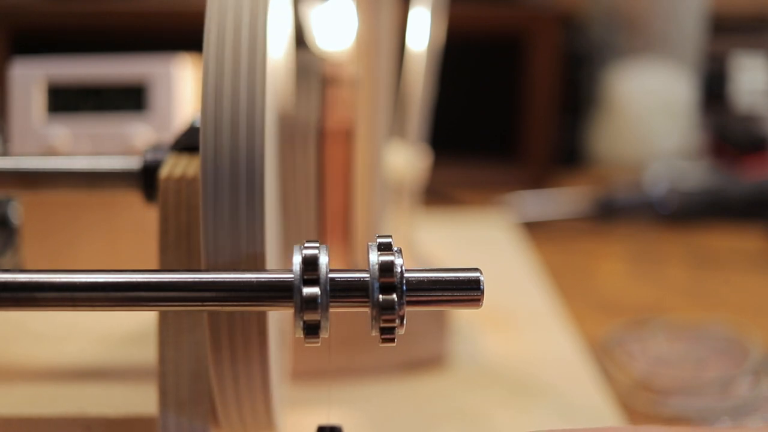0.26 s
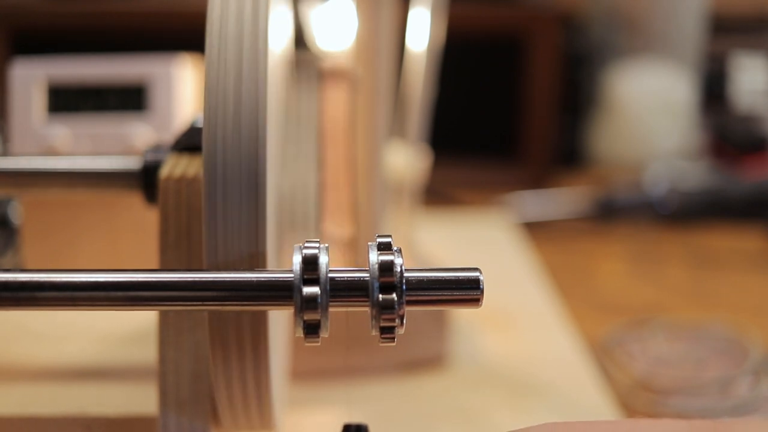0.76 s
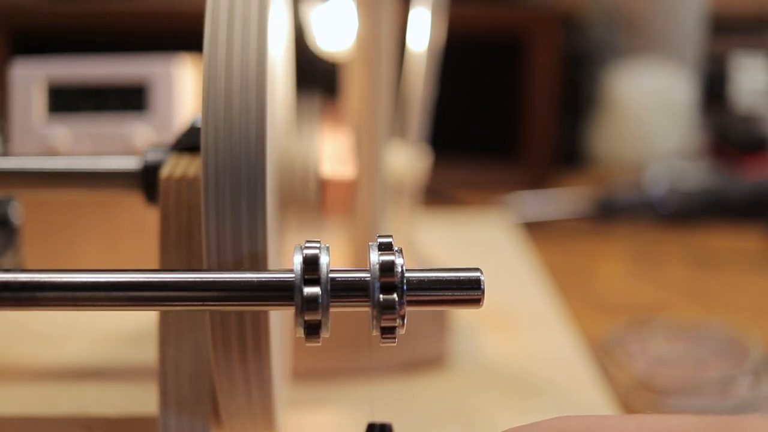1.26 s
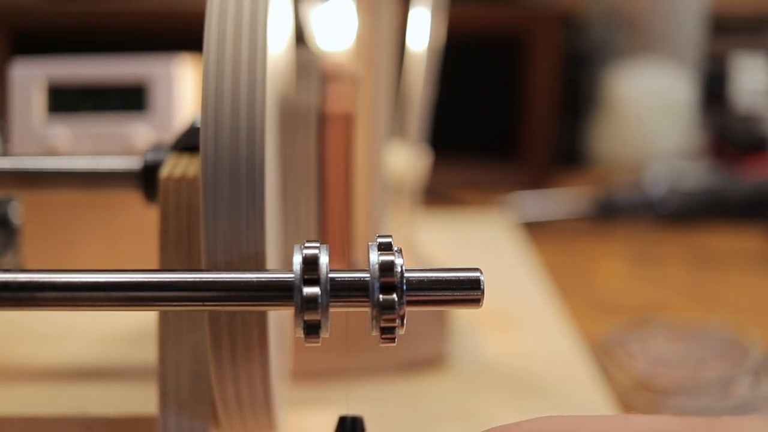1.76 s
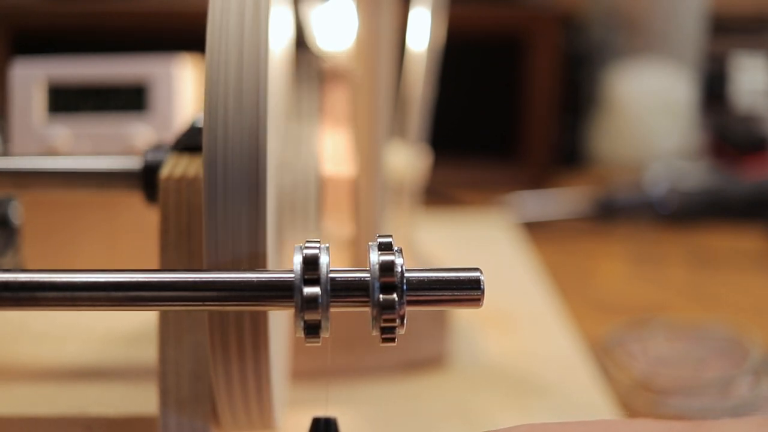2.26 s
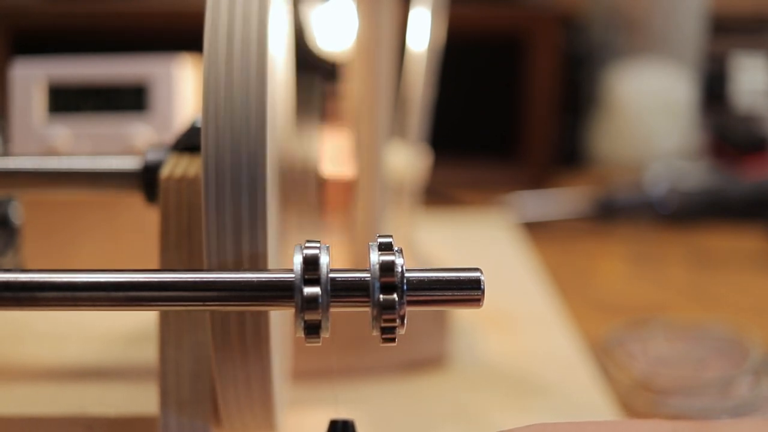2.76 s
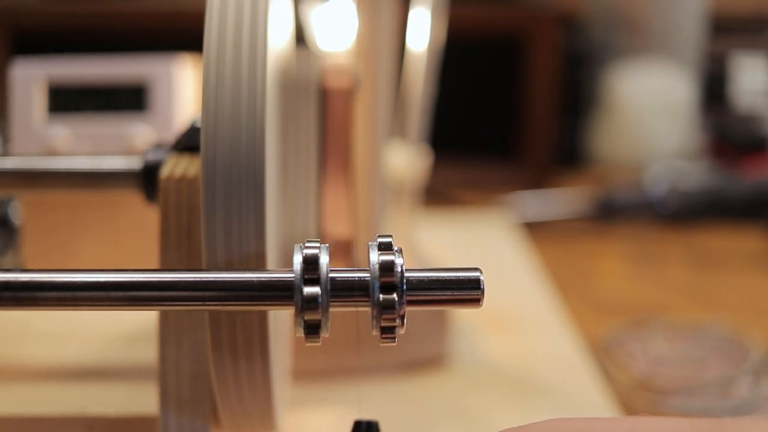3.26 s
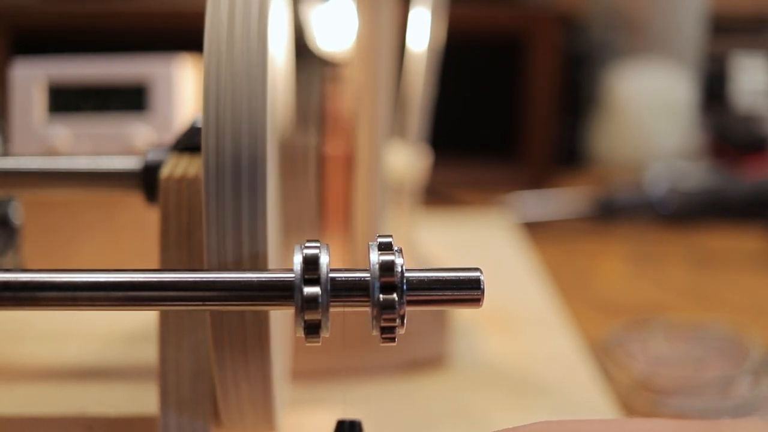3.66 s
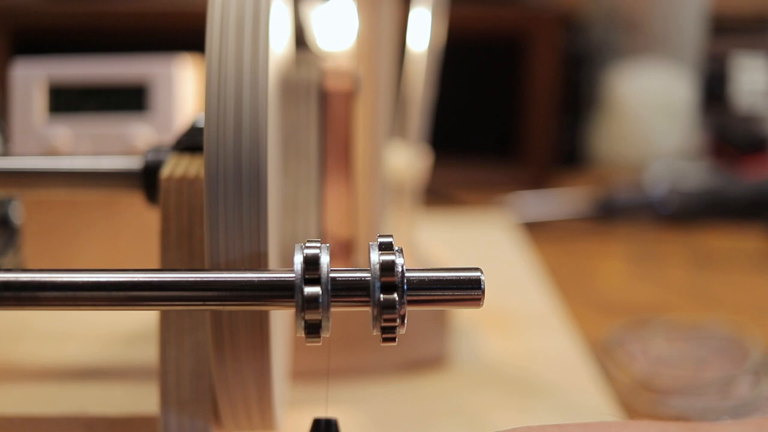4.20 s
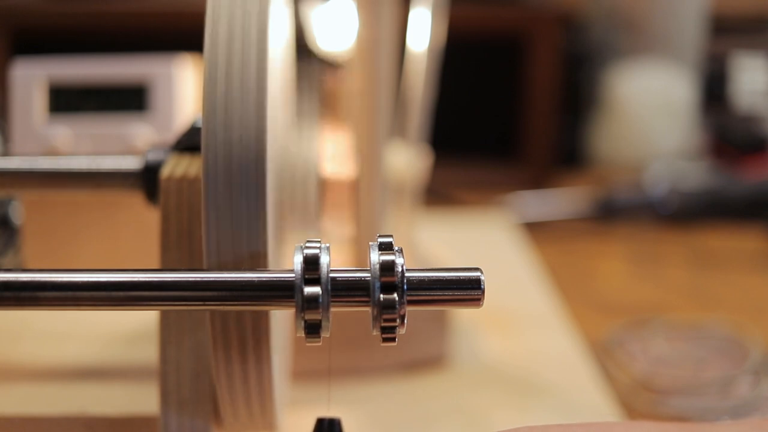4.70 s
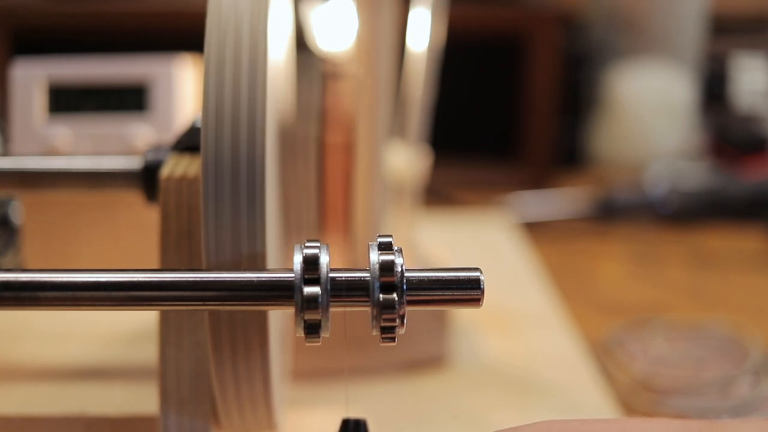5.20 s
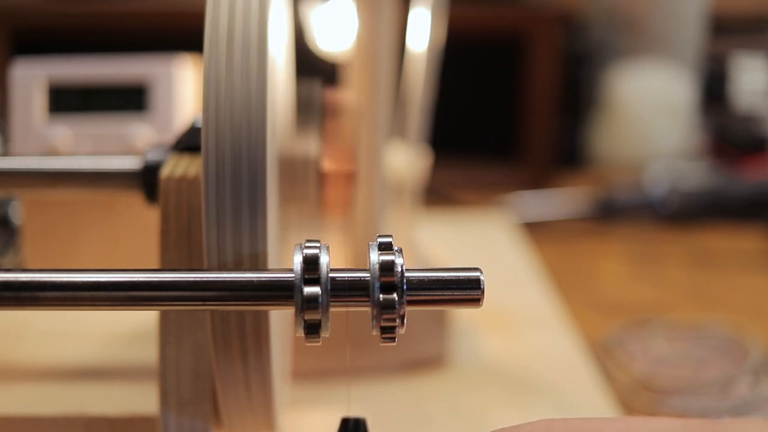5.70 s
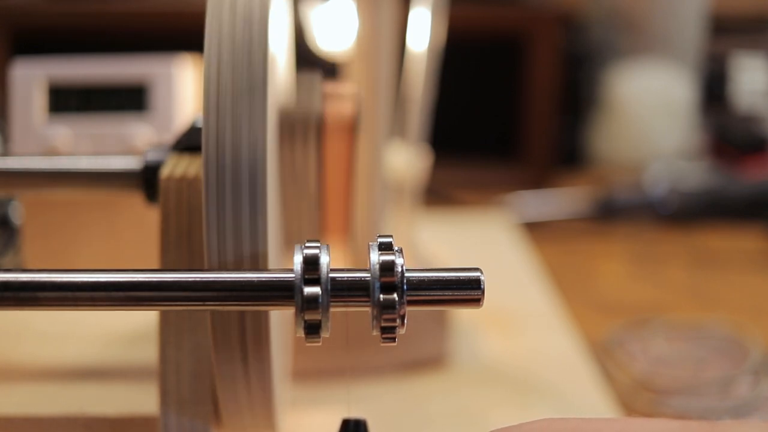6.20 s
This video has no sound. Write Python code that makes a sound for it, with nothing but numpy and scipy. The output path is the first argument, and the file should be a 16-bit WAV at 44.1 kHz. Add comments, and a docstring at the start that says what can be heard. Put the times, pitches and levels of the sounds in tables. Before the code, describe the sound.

A small geared motor runs with a steady, fluttering high whine, rattle and rapid chirps, then starts falling in pitch near the end.

```python
"""A steady, fluttering whine: a small geared motor spins a homemade coil winder on a wooden bench.
The whine comes from the teeth of its small gear. Around it the rotor (the motor's spinning part) hums,
the brushes buzz, the gears rattle and a dry shaft chirps once a turn, over faint room noise.
Near the end the power is cut: hum and buzz die, the whine falls and the chirps stand out as it coasts."""
import sys
import numpy as np
from scipy import signal
from scipy.fft import rfft, irfft
from scipy.io import wavfile
from scipy.ndimage import uniform_filter1d

SR = 44100
rng = np.random.default_rng(int(sys.argv[2]) if len(sys.argv) > 2 else 0)


def log_audio(samples):
    """Write samples as a 16-bit WAV file to the path given in sys.argv[1]."""
    # one column per channel
    frames = np.atleast_2d(samples).T
    # limit to full scale, then quantise
    limited = np.clip(frames, -1, 1)
    pcm = np.round(limited * 32767).astype(np.int16)
    wavfile.write(sys.argv[1], SR, pcm)


N = 284443
T = np.arange(N) / SR

# Levels in the tables are relative. A "multiple" is a pitch divided by the rotor's speed.
# tone of the room's air (frequency [Hz], level [dB])
ROOM_TONE = [(20, -33), (45, -16), (65, -27), (100, 9.5), (160, -3), (230, -2.5), (400, -9), (1500, -3),
             (4000, 2), (8000, -4.5), (15000, -23)]
# rotor speed under power (time [s], speed [turns/s])
POWERED_SPEED = [(0.1, 98.3), (0.93, 98.4), (1.42, 98.2), (3.6, 98.6), (5.36, 98.3), (5.5, 98.2)]
# hum of the rotor's imbalance and magnetic pull (multiple [x], level [dB])
HUM_TONES = [(0.5, -62), (1, -45.5), (2, -48.5), (3, -49), (4, -57.5), (5, -65), (6, -50.5)]
# slow swell of the hum as the wire pulls (time [s], level [dB])
WIRE_PULL = [(0, 1), (.7, 2), (1.3, 2.5), (2.3, -0.5), (3.4, 2), (4.1, 1.5), (4.8, -1.5), (5.6, 2)]
# buzz of the brushes on the motor's turning contacts (multiple [x], level [dB])
BRUSH_TONES = [(23, -53), (24, -48), (25, -51), (26, -43), (29, -49), (32, -50), (34, -52), (36, -48),
               (38, -48), (39, -47), (40, -44), (41, -49), (43, -52), (44, -47), (45, -51), (46, -51),
               (47, -48), (48, -46), (50, -54), (53, -54), (54, -57), (55, -54), (56, -58), (57, -58),
               (59, -58), (60, -59), (67, -58), (79, -62), (95, -60), (96, -60)]
# tone of the brushes' fizz (frequency [Hz], level [dB])
FIZZ_TONE = [(4500, -16), (5500, 5), (7000, -2), (8300, -8), (9500, -3), (11000, -14), (15000, -8)]
# tones of those contacts that go on without current (multiple [x], level [dB])
CONTACT_TONES = [(32, -5), (36, -7), (48, 0), (54, -10), (60, -10), (72, -5), (96, -9)]
# where the motor's case rings (frequency [Hz], width [Hz], level [dB])
CASE_RINGS = [(2740, 470, -3), (3920, 270, 1), (4400, 450, -2)]
# broad response of the frame (frequency [Hz], level [dB])
FRAME_TONE = [(25, -38), (65, -12), (115, -9.5), (155, -10), (215, -6), (500, -5), (900, -2.5), (2100, -1),
              (3600, -7.5), (4650, -3.5), (5200, -11), (8000, -18.5), (9300, -17.5), (10500, -23.5),
              (13500, -32.5)]
# where the gearbox rings (frequency [Hz], width [Hz], level [dB])
GEARBOX_RINGS = [(1151, 72, -34.5), (1190, 47, -56), (965, 300, -41.5)]
# sharper ticks of the gears (time [s], level [dB])
HARD_TICKS = [(0.8607, -13), (2.0614, -14), (3.039, -15), (3.3144, -17), (3.4832, -15.5), (3.693, -14.5),
              (4.4598, -12), (4.6684, -15)]
# tone of a tick (frequency [Hz], level [dB])
TICK_TONE = [(400, -6), (1500, 1.5), (2600, 8.5), (5000, -5), (8000, -12.5), (15000, -41)]
# dry rubbing in the bearing (frequency [Hz], width [Hz], level [dB])
RUB_BANDS = [(2570, 204, -38.5), (2860, 500, -39.5), (4060, 250, -55), (9060, 1400, -58)]
# how hard the dry bearing grips (time [s], level [dB])
BEARING_GRIP = [(0, -2), (1.8, 3.5), (2.2, -3.5), (3.5, 1), (4.3, -2.5), (5.6, -1.5)]
# notes the slack shaft draws from the case and the bearing (pitch [Hz], level [dB])
SLACK_NOTES = [(3950, -38), (6000, -45.5), (11500, -57.5)]
# the shaft's hardest squeaks (time [s], level [dB], pitch [Hz])
HARD_SQUEAKS = [(0.1296, -31, 8900), (1.0645, -33, 8900), (1.5589, -30.5, 9100), (2.83, -32, 8840),
                (4.7706, -28.5, 8740), (5.798, -30, 9010)]
# the coasting shaft's hardest chirps (time [s], level [dB], pitch [Hz])
HARD_CHIRPS = [(5.941, -22.5, 2620), (6.1496, -18.5, 2600), (6.177, -24.5, 2540), (6.2245, -23, 2590)]
# overtones of the last squeal (pitch [x SQUEAL_HZ], level [dB])
SQUEAL_TONES = [(2, -34.5), (3, -36), (4, -50), (5, -54)]
# tone of the scratch in a squeak (frequency [Hz], level [dB])
SCRATCH_TONE = [(2000, -18), (4000, 3), (6000, 2), (9000, -20), (14000, -16)]
# the tone of meeting teeth and the side tones of uneven gears (multiple [x], level [dB])
WHINE_TONES = [(8.5, -53), (9, -53), (9.5, -54), (10.5, -56), (11, -32), (11.5, -42), (12, -45), (14, -51),
               (16, -54)]
# bench resonances that the falling whine passes through (frequency [Hz], width [Hz], boost [dB])
BENCH_RINGS = [(850, 50, 3), (630, 60, 8), (420, 50, 3)]

TEETH, WHEEL_RATIO, SHAFT_RATIO = 11, 11 / 81, 22 / 81  # small gear's teeth; turns per rotor turn
RIPPLE_HZ = 120  # pulsing of the power supply
CUT_S, FRICTION_HZ_PER_S, DRAG_PER_S = 5.61, 52, .41  # the power cut and the braking after it
CURRENT_HOLD_S, CURRENT_FADE_S, IMBALANCE_DB = .07, .057, -16
SLACK_HZ = 9.9  # the gears go slack over this drop in speed
POWERED_CONTACTS_DB, FREE_CONTACTS_DB = -57, -31.5
TOUCH_S, APART_DIP_DB, CROSSING_DIP_DB = 5.752, 9.5, 6  # a moment of firm tooth contact; whine dips
SLIP_S, SLIP_STRETCH = 5.796, .58  # the moment of one slip; how strongly slowing lengthens slips
CHIRP_HZ, CHIRP_DB, SQUEAK_HZ, SQUEAK_DB = 2710, -27.5, 8850, -41.5  # base values; each slip varies
FREE_SQUEAK_DB, REBOUND_DB = 2, -28.5
SQUEAL_S, SQUEAL_HZ = 6.428, 2890


def undb(db):
    """Turn decibels into a gain."""
    return 10 ** (np.asarray(db) / 20)


def level(x, db):
    """Scale a sound to an average (rms) level."""
    return x * undb(db) / np.sqrt(np.mean(x ** 2))


def curve(rows):
    """Join (time [s], value) rows with straight lines."""
    return np.interp(T, *np.transpose(rows))


def wander(rate):
    """A smooth random wobble of size about 1, with rate new values a second."""
    hold = max(int(SR / rate), 1)
    steps = np.repeat(rng.standard_normal(N)[:N // hold + 1], hold)
    return level(uniform_filter1d(uniform_filter1d(steps, hold), hold)[:N], 0)


def wave(turns):
    """A sine wave with one cycle per turn and a random start."""
    return np.sin(2 * np.pi * (turns + rng.random()))


def ring(x, hz, width):
    """Let a sound ring at one frequency."""
    return signal.lfilter(*signal.iirpeak(hz, hz / width, fs=SR), x)


def colour(x, points, size=2048):
    """Shape a sound's tone with (frequency [Hz], level [dB]) points."""
    hz, db = np.transpose(points)
    grid = np.maximum(np.arange(size + 1) * SR / (2 * size), 1)
    cepstrum = irfft(np.log(undb(np.interp(np.log(grid), np.log(hz), db))))
    # make the filter ring only after a sound, never before it
    cepstrum[1:size] *= 2
    cepstrum[size + 1:] = 0
    return signal.fftconvolve(x, irfft(np.exp(rfft(cepstrum))))[:N]


def clicks(rate, spread_db):
    """Tiny random hits of uneven size, about rate a second."""
    hits = (rng.random(N) < rate / SR) * rng.choice([-1, 1], N)
    return level(hits * undb(spread_db * np.minimum(rng.exponential(size=N), 5)), 0)


def slackness(speed):
    """0 while the motor pulls the gears tight, 1 once they run free."""
    return np.clip((np.interp(CUT_S, T, speed) - speed) / SLACK_HZ, 0, 1) * (T > CUT_S)


def slowing(speed, fall_db):
    """A gain that drops by fall_db each time the speed halves."""
    return undb(fall_db * np.log2(speed / speed.max()))


def since(turns, start):
    """Turns counted from a start time."""
    return turns - np.interp(start, T, turns)


def each_turn(turns):
    """The times at which a turn is completed."""
    return T[1:][np.diff(np.floor(turns)) > 0]


def rotor_speed():
    """Turns a second: nearly steady under power, then braked by friction and drag."""
    offset = FRICTION_HZ_PER_S / DRAG_PER_S
    speed = (curve(POWERED_SPEED) + offset) * np.exp(-DRAG_PER_S * np.maximum(T - CUT_S, 0)) - offset
    return speed * (1 + .0004 * wander(9))


def room_air():
    """The faint, steady noise of the room."""
    return level(colour(rng.standard_normal(N), ROOM_TONE, size=4096), -43)


def rotor_hum(turn):
    """A low hum that throbs with the load of the big wheel, plus the power supply's ripple."""
    load = 1 + .55 * wave(WHEEL_RATIO * turn) + .25 * wave(SHAFT_RATIO * turn) + .08 * wander(25)
    hum = sum(undb(db + 2) * wave(k * turn) for k, db in HUM_TONES)
    ripple = wave(RIPPLE_HZ * T) * (1 + .7 * wave(turn))
    return hum * load + level(ripple, -50.5)


def brush_buzz(turn):
    """The brushes scrape the same track on every turn: a buzz with a faint fizz above it."""
    buzz = sum(undb(db) * wave(k * turn) * (1 + .12 * wander(12)) for k, db in BRUSH_TONES)
    track = irfft(np.exp(2j * np.pi * rng.random(160)), 1024)
    scrape = np.interp(turn + .001 * wander(60), np.arange(len(track)) / len(track), track, period=1)
    fizz = level(colour(scrape, FIZZ_TONE), -50.5)
    side_tone = level(wave(36 * turn - RIPPLE_HZ * T), -47)  # the ripple splits it off overtone 36
    return undb(3) * buzz + fizz + side_tone


def motor_contacts(turn, speed):
    """The turning contacts make rough tones that ring the motor's case, louder once it runs free."""
    tones = sum(undb(db) * wave(k * turn + .18 * wander(300)) for k, db in CONTACT_TONES)
    strength = undb(POWERED_CONTACTS_DB + slackness(speed) * (FREE_CONTACTS_DB - POWERED_CONTACTS_DB))
    case = sum(undb(db) * ring(ring(tones, hz, width), hz, width) for hz, width, db in CASE_RINGS)
    return strength * slowing(speed, fall_db=1) * case


def gear_rattle(turn, speed):
    """Loose teeth hit in bunches and ring the frame and gearbox, softer and duller when slow."""
    pace = speed / speed.max()
    bunches = undb(1.7 * wave(turn) + 1.5 * wave(2 * turn)
                   + 1.4 * wave(RIPPLE_HZ * T) + 1.3 * wave(WHEEL_RATIO * turn))
    frame = level(colour(bunches * clicks(rate=7000, spread_db=2.5), FRAME_TONE), -32)
    dull = signal.sosfilt(signal.butter(1, 4500, fs=SR, output="sos"), frame)
    knocks = clicks(rate=260, spread_db=.9) * undb(.87 * wave(WHEEL_RATIO * turn))
    knocks = signal.sosfilt(signal.butter(2, [700, 1700], "band", fs=SR, output="sos"), knocks)
    box = sum(level(ring(knocks, hz, width), db) for hz, width, db in GEARBOX_RINGS)
    return slowing(speed, fall_db=6.2) * (pace * frame + (1 - pace) * dull + pace ** 1.7 * box)


def tooth_ticks():
    """Now and then a tooth lands hard and knocks the frame."""
    bursts = sum(undb(db) * np.exp(-np.abs(T - at) / .004) * (T >= at) for at, db in HARD_TICKS)
    return bursts * level(colour(rng.standard_normal(N), TICK_TONE), -7)


def chirps(rows, speed, length, glide, rough):
    """Sticking and slipping makes a short, sagging tone per (time [s], level [dB], pitch [Hz]) row."""
    out = np.zeros(N + SR)
    uneven_grip = np.resize(rough * wander(900), N + SR)
    stretch = (speed.max() / speed) ** SLIP_STRETCH
    for at, db, hz in rows:
        start = max(int((at - length / 5) * SR), 0)
        longer = stretch[min(start, N - 1)]
        progress = np.linspace(0, 1, int(length * longer * SR))
        span = slice(start, start + len(progress))
        cycles = np.cumsum(hz * (1 + glide * (.5 - progress))) / SR + uneven_grip[span] / longer
        out[span] += undb(db) * np.sin(np.pi * progress ** .89) ** 2 * wave(cycles)
    return out[:N]


def shaft_slips(turn, speed):
    """Each turn the shaft slips with a chirp and a thin squeak; when slack it also rebounds and sings."""
    angle, slack = since(SHAFT_RATIO * turn, SLIP_S), slackness(speed)
    times = each_turn(angle)
    late, size, pitch, squeak_size = rng.uniform(-1, 1, (len(times), 4)).T
    grip, free, drift = (np.interp(times, T, v) for v in (curve(BEARING_GRIP), slack, wander(4)))
    chirp_rows = np.transpose([times + .004 * late, CHIRP_DB + 2 * size + grip, CHIRP_HZ + 110 * pitch])
    squeak_db = SQUEAK_DB + 3.2 * squeak_size + grip / 2 + FREE_SQUEAK_DB * free + 1.5 * drift * (1 - free)
    squeak_rows = np.transpose([times + .0025 * late, squeak_db, SQUEAK_HZ + 250 * pitch])
    rebounds = [(at, REBOUND_DB, CHIRP_HZ + 110 * rng.uniform(-1, 1))
                for at in each_turn(angle + .5) if at > CUT_S]
    notes = [(at, db + 2 * rng.normal(), hz * (1 + .02 * rng.normal()))
             for at in each_turn(2 * angle) if at > CUT_S for hz, db in SLACK_NOTES]
    chirp = chirps(chirp_rows, speed, length=.016, glide=.08, rough=.07)
    chirp += slack * chirps(rebounds + notes, speed, length=.016, glide=.08, rough=.09)
    squeak = chirps(squeak_rows, speed, length=.017, glide=.048, rough=.27)
    return slowing(speed, fall_db=.3) * chirp, squeak


def dry_shaft(turn, speed):
    """The shaft rubs and slips in its dry bearing; a few slips bite harder and the slowest squeals."""
    chirp, squeak = shaft_slips(turn, speed)
    chirp += chirps(HARD_CHIRPS, speed, length=.012, glide=.067, rough=.07)
    squeak += undb(-5.5) * chirps(HARD_SQUEAKS, speed, length=.018, glide=.033, rough=.22)
    squeal_rows = [(SQUEAL_S, db, k * SQUEAL_HZ) for k, db in SQUEAL_TONES]
    squeal = chirps(squeal_rows, speed, length=.021, glide=.11, rough=.25)
    # on the slack shaft every squeak drags a short scratch with it
    scuff = level(colour(clicks(rate=3000, spread_db=5), SCRATCH_TONE), 2.5)
    scratch = slackness(speed) * uniform_filter1d(np.abs(squeak), SR // 40) * scuff
    rub = sum(level(ring(ring(rng.standard_normal(N), hz, width), hz, width), db)
              for hz, width, db in RUB_BANDS)
    rub *= undb(1.07 * wander(40)) * slowing(speed, fall_db=.5)
    return chirp + squeak + squeal + scratch + rub


def gear_whine(turn, speed):
    """The small gear's teeth roll on a slightly off-centre wheel, so their whine flutters."""
    slack = slackness(speed)
    wobble_radians = .52 * wave(WHEEL_RATIO * turn) + .18 * wander(90) + .9 * slack * wander(110)
    rolled = turn + wobble_radians / (2 * np.pi * TEETH)
    pressure = 1 + .08 * wave(WHEEL_RATIO * turn) + .1 * wave(SHAFT_RATIO * turn) + .13 * wander(140)
    tones = sum(undb(db) * wave(k * rolled + (k != TEETH) * .07 * wander(30)) for k, db in WHINE_TONES)
    loose_tone = slack * wave((TEETH + 1) * rolled) * undb(-34)
    # slack teeth touch once a wheel turn, and the whine dips in between
    apart = (T > CUT_S) * np.sin(np.pi * since(WHEEL_RATIO * turn, TOUCH_S)) ** 2
    dip_db = APART_DIP_DB * uniform_filter1d(apart, size=800)
    dip_db += CROSSING_DIP_DB * np.sin(np.pi * slack)  # going slack, the teeth cross their gap
    bench_db = sum(db / (1 + (2 * (TEETH * speed - hz) / width) ** 2) for hz, width, db in BENCH_RINGS)
    strength = slowing(speed, fall_db=13) * undb(bench_db - dip_db)
    return strength * pressure * (undb(4) * tones + loose_tone)


def scene():
    """Mix the room and the machine, whose parts all follow one count of rotor turns."""
    speed = rotor_speed()
    turn = np.cumsum(speed) / SR
    # after the cut the current lingers, then dies; a weak hum from the imbalance stays
    current = np.exp(-np.maximum(T - CUT_S - CURRENT_HOLD_S, 0) / CURRENT_FADE_S)
    hum_gain = current + (1 - current) * undb(IMBALANCE_DB) * slowing(speed, fall_db=8)
    hum = hum_gain * undb(curve(WIRE_PULL)) * rotor_hum(turn)
    buzz = current ** 2 * brush_buzz(turn)  # follows the current squared, so it dies first
    motor = hum + buzz + motor_contacts(turn, speed)
    gears = gear_whine(turn, speed) + gear_rattle(turn, speed) + tooth_ticks()
    return (motor + gears + dry_shaft(turn, speed) + room_air())[None]


def record(dry):
    """Cut the highest treble, above 15700 Hz."""
    return signal.sosfilt(signal.ellip(10, .2, 80, 15700, fs=SR, output="sos"), dry)


dry = scene()
out = record(dry)
log_audio(out)
```